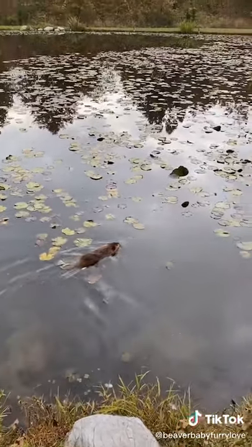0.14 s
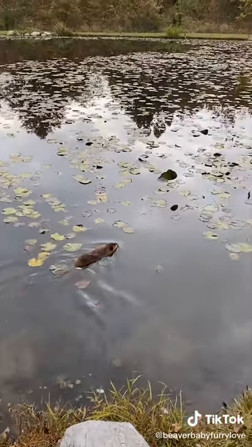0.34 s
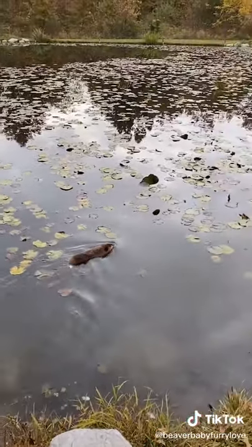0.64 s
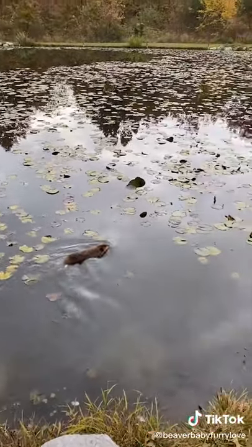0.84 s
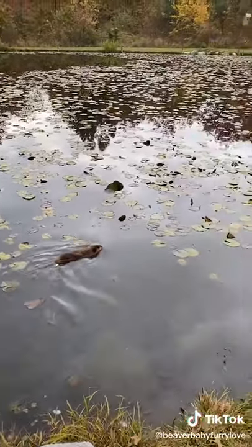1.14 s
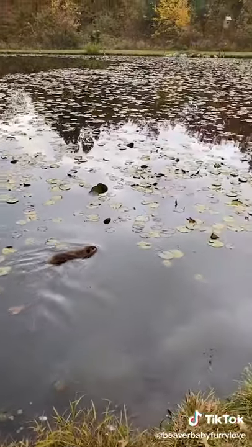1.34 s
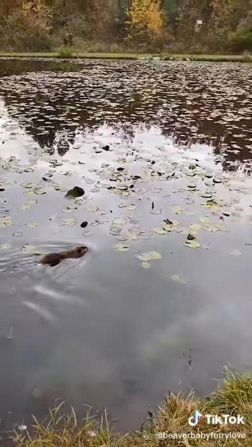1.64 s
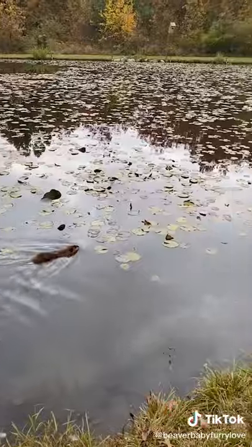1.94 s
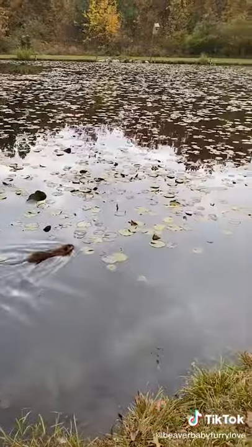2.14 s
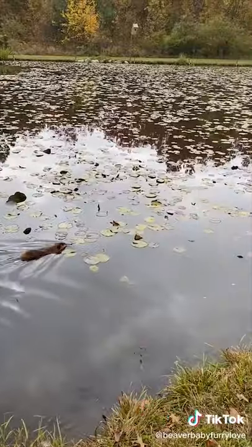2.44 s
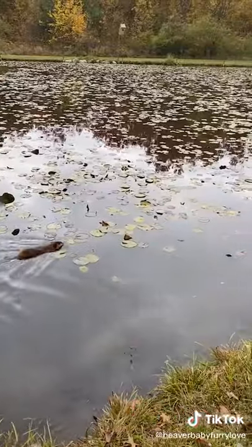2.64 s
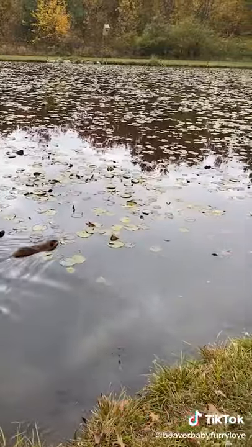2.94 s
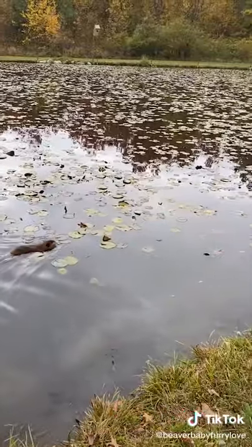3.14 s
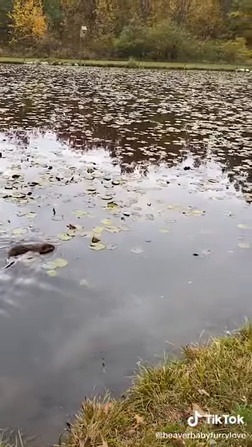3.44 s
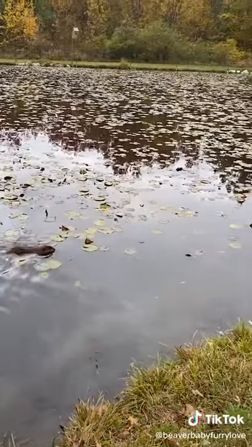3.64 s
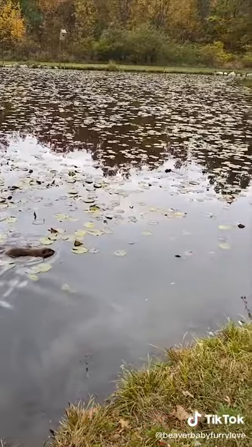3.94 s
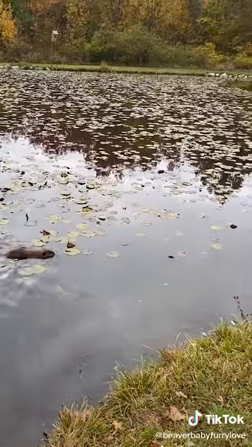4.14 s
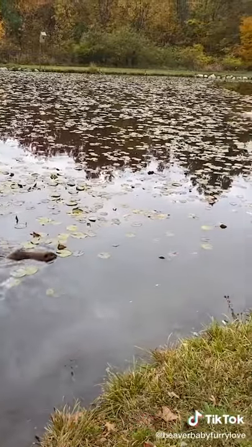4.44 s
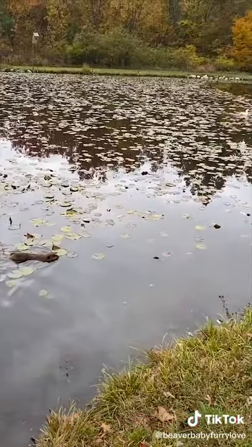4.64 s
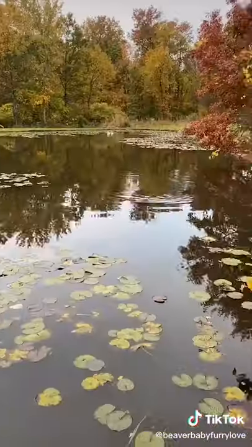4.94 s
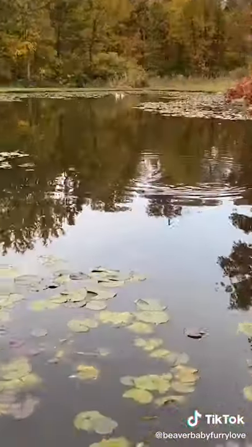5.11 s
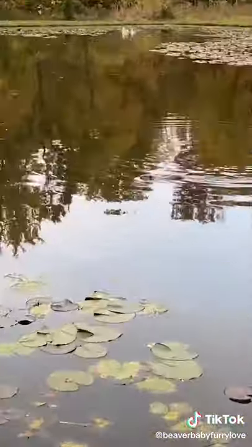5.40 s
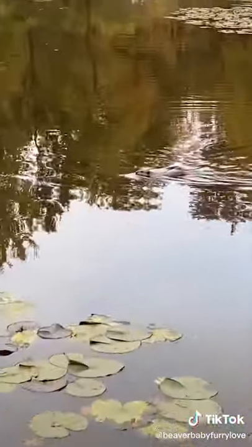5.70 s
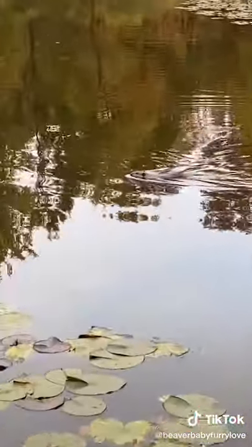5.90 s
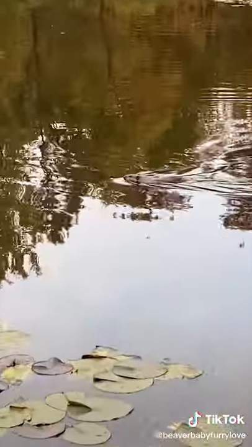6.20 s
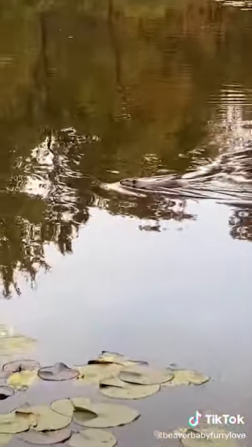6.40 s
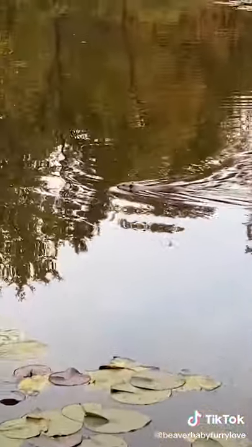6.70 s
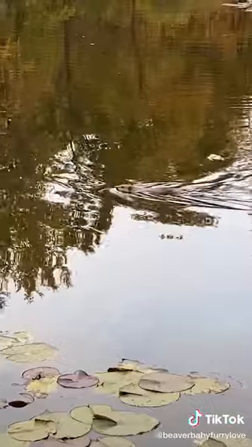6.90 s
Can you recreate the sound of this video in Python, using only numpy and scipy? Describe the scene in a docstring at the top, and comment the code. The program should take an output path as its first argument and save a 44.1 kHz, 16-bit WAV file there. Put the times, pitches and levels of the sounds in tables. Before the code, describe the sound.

Low rumble of distant traffic by a pond, with faint bird chirps and microphone bumps, cutting to quieter air and a far motor.

```python
"""A far road rumbles and hisses beyond a pond in autumn woods, and an engine drones under it.
Small birds chip and whistle in pitch glides, and crickets trill faintly, one pip to a wing stroke;
the trees scatter both into echoes. A hand bumps the microphone, and the bank grass rustles.
After a moment of silence near 5 s the scene changes to a much quieter place on the bank,
where the birds and crickets go on and a far motor swells."""
import sys
import numpy as np
from scipy import signal
from scipy.fft import rfft, irfft, next_fast_len
from scipy.io import wavfile
from scipy.ndimage import uniform_filter1d, map_coordinates

SR = 44100
rng = np.random.default_rng(int(sys.argv[2]) if len(sys.argv) > 2 else 0)


def master(y):
    """Save y as 16-bit WAV."""
    cut = np.clip(np.atleast_2d(y).T, -1, 1)
    pcm = np.round(cut * 32767)  # scale
    wavfile.write(sys.argv[1], SR, pcm.astype(np.int16))


N = 311346
TIME = np.arange(N) / SR
ROAD_END_S, CALM_START_S = 4.898, 4.965
CALM_LEAD_MS = 0.0084  # at the quiet place the callers are nearly straight ahead

# Stereo width of the noise near the road: frequency_hz, side_over_mid_db
ROAD_WIDTH = [(60, -36.5), (92, -32.5), (140, -19.5), (220, -13.5), (330, -6.5), (510, -0.5), (790, 1),
              (1800, -2.5), (4400, 5.5), (6800, -1)]
# Stereo width of the noise at the quiet place: frequency_hz, side_over_mid_db
CALM_WIDTH = [(60, -27.5), (170, -15.5), (290, -10), (490, -6), (1400, -3), (6800, -22.5)]


def traffic():
    """Many far vehicles add incoherently into a rumble and a tyre hiss, both slowly growing."""
    # Spectra: frequency_hz, density_db
    rumble_spectrum = [(12, -56.5), (22, -19), (42, -7), (60, 1), (81, 0.5), (99, -3), (129, -9),
                       (161, -13.5), (230, -18.5), (310, -24), (410, -29), (490, -39.5), (600, -46.5),
                       (900, -84)]
    tyre_spectrum = [(150, -16.5), (420, 4.5), (600, -1), (850, 3), (1300, 2), (1700, -5.5), (2200, -12),
                     (2900, -26.5), (4400, -32), (6500, -33.5), (9000, -84.5)]
    # Balance of the tyre hiss: frequency_hz, left_over_right_db
    balance = [(170, -3), (490, -4), (830, 4.5), (1400, 5), (2400, -2.5), (6800, -1.5)]
    rumble = amp(-46.5 + 0.5455 * TIME) * rush(rumble_spectrum, ROAD_WIDTH, patchy_db=-0.5)
    tyre_db = -66 + 0.89 * TIME + 0.88 * wobble(9)
    tyres = amp(tyre_db) * rush(tyre_spectrum, ROAD_WIDTH, patchy_db=2)
    return rumble + filtered(tyres, lambda hz: amp(along(balance, hz) * np.array([[.5], [-.5]])))


def far_engine():
    """Pitch follows rotation speed: a low drone revs up, sinks back, then rises again and holds."""
    # time_s, pitch_hz, level_db
    course = [(0, 79.02, -42.5), (.5, 70.6, -49), (1.9, 72.68, -48.5), (2.35, 77.67, -79),
              (2.63, 107, -43.5), (3.15, 89.9, -53), (3.8, 76.05, -57), (4.3, 93.6, -48.5),
              (4.9, 94.05, -48.5)]
    return drone(course, octave_db=-21, waver_db=-0.5, drift=0.026, rate_hz=12)


def nearing_car():
    """One car's band of noise grows as it nears, with less loss to spreading."""
    # time_s, level_db
    approach = [(0, -86.5), (2.6, -85), (3.7, -71), (4.3, -69), (4.8, -63.5)]
    # frequency_hz, density_db
    spectrum = [(200, -21.5), (480, 6), (700, 1.5), (1100, -6), (1700, -5.5), (2300, -11), (3200, -19),
                (5000, -35.5), (9000, -71)]
    level_db, = curves(approach)
    return amp(level_db) * rush(spectrum, ROAD_WIDTH)


def birds():
    """Birdsong is frequency modulation: each kind of call repeats its own glide, buzz and rasp."""
    # Calls: start_s, length_s, middle_pitch_hz, level_db
    slurs = [(1.04, 0.057, 3950, -72), (1.18, 0.073, 3580, -76), (1.828, 0.056, 3860, -75.5),
             (2.048, 0.042, 4020, -80.5), (2.842, 0.064, 4300, -79), (3.85, 0.071, 4130, -82.5),
             (3.98, 0.053, 3970, -78), (4.015, .055, 3650, -77), (4.125, 0.051, 3670, -77),
             (4.16, .04, 3920, -78), (4.275, 0.048, 4030, -74), (4.412, 0.062, 3850, -79),
             (4.628, 0.06, 3790, -77), (4.775, 0.047, 3506, -78.5)]  # straight downward slides
    buzzes = [(0.255, 0.14, 5720, -84), (1.322, 0.064, 5240, -73), (2.803, 0.026, 4930, -79),
              (2.875, 0.045, 5400, -81), (4.805, 0.1, 5500, -85.5), (5.361, 0.053, 5600, -90),
              (5.73, 0.023, 4330, -92), (5.735, 0.19, 5440, -100), (5.92, 0.14, 5530, -96),
              (6.55, 0.066, 5320, -90.5), (6.869, 0.057, 5420, -98)]  # level rasps from deep in the trees
    hooks = [(4.208, .11, 7220, -57), (5.19, 0.115, 7160, -81.5), (5.305, 0.049, 7380, -85.5)]  # thin whistles that drop and level out
    wisps = [(0.671, 0.084, 6800, -77.5), (2.73, .04, 6550, -83), (3.385, 0.074, 8140, -80)]  # high, far and blurred
    lisps = [(.56, 0.043, 7440, -82), (1.635, 0.054, 7300, -65.5), (2.139, .06, 7870, -75),
             (6.714, .028, 7060, -88), (6.877, 0.065, 6700, -88.5)]  # soft and rising
    ticks = [(2.381, 0.018, 7500, -67), (2.436, 0.017, 7370, -63.5), (2.492, 0.017, 7550, -64.5)]  # very short upward flicks
    twitters = [(6.602, 0.049, 8400, -98), (6.644, 0.071, 8300, -90), (6.711, 0.068, 8030, -90)]  # high notes arching up and down
    chirps = [(5.806, 0.066, 2810, -87.5), (6.165, .048, 3020, -92), (6.21, 0.05, 2490, -89.5),
              (6.257, 0.053, 2180, -88), (6.45, 0.025, 2760, -95), (6.795, 0.05, 2130, -89.5)]  # the lower voice of a bigger bird
    pipes = [(6.268, .04, 1610, -92), (6.3, 0.1, 2030, -96), (6.355, 0.046, 1580, -96)]  # low, hoarse notes that ring on
    squawks = [(1.851, 0.049, 2570, -72.5), (1.86, .05, 2070, -71), (1.943, 0.036, 2450, -73),
               (2.47, 0.026, 2950, -80), (2.642, 0.026, 2480, -78.5), (4.03, 0.074, 2270, -76),
               (4.3, 0.038, 2200, -82), (5.3, .04, 3400, -94), (5.335, 0.036, 2640, -92),
               (6.134, 0.027, 2000, -91), (6.585, 0.025, 2200, -94), (6.765, 0.053, 2220, -97),
               (6.915, 0.027, 2200, -93)]  # hoarse and far
    chips = [(1.741, 0.0087, 6350, -38.5)]  # one sharp chip close by
    kinds = [  # calls, lead_ms, shape
        (slurs, .035, dict(glide=(1.13, .875), buzz_hz=70, rasp_hz=100, echo_db=-7, build_s=.0019)),
        (buzzes, .041, dict(glide=(.98, 1.01), buzz_hz=324, rasp_hz=44.5, echo_db=5.5,
                            build_s=.008, linger=1.25)),
        (hooks, .06738, dict(glide=(1.246, .97), buzz_hz=90, rasp_hz=100, echo_db=-4.5,
                             bend=.9, build_s=.0074)),
        (wisps, .0692, dict(glide=(1.1, .88), buzz_hz=150, rasp_hz=200, echo_db=5, build_s=.006)),
        (lisps, .068, dict(glide=(.86, 1.08), buzz_hz=149, rasp_hz=264, echo_db=-6)),
        (ticks, .068, dict(glide=(.98, 1.23), buzz_hz=503, rasp_hz=796, echo_db=-4)),
        (twitters, .025, dict(glide=(.94, .65), buzz_hz=90, rasp_hz=110, echo_db=-5, bend=.64)),
        (chirps, .1, dict(glide=(1.11, .94), buzz_hz=30, rasp_hz=60, echo_db=-4.5, build_s=.004)),
        (pipes, 0, dict(glide=(1.03, .95), buzz_hz=45, rasp_hz=85, echo_db=5, linger=1.3)),
        (squawks, .074, dict(glide=(1.04, .9), buzz_hz=108, rasp_hz=105, echo_db=.5, build_s=.0023)),
        (chips, .062, dict(glide=(.87, 1.17), buzz_hz=0, rasp_hz=40, echo_db=-10, octave_db=-25.5))]
    out = np.zeros((2, N))
    for calls, lead_ms, shape in kinds:
        for start_s, length_s, pitch_hz, level_db in calls:
            call = bird_note(length_s, pitch_hz, **shape)
            add_caller(out, start_s, amp(level_db) * call, lead_ms)
    return out


def bird_note(length_s, pitch_hz, glide, buzz_hz, rasp_hz, octave_db=-60, bend=1, **echo):
    """A frequency-modulated whistle and its echo; buzz_hz and rasp_hz are pitch deviations."""
    progress = np.linspace(0, 1, max(int(length_s * SR), 32))
    chance = wanderer(progress * length_s, knots=256)
    start, end = glide  # ratios to the middle pitch
    contour = np.polyval(np.polyfit([0, .5, 1], [start, 1, end], deg=2), progress ** bend)
    buzz = np.sin(phase_of(140 + 45 * chance(200)))
    phase = phase_of(pitch_hz * contour + buzz_hz * buzz + rasp_hz * chance(900))
    swell = np.abs(np.sin(np.pi * progress)) ** .7 * amp(3 * chance(150))
    tone = np.sin(phase) + amp(octave_db) * np.sin(2 * phase)
    return among_trees(unit(swell * tone), **echo)


def hand_bumps():
    """Structure-borne sound: each bump of the hand is one low cycle inside a shudder of noise."""
    # time_s, pitch_hz, level_db
    bumps = [(0.874, 114, -29), (0.905, 54.4, -30), (3.376, 78.5, -26.5), (3.417, 54.3, -22.5),
             (3.575, 58.7, -25), (4.111, 131, -38), (4.14, 109, -24.5)]
    out = np.zeros((2, N))
    for time_s, pitch_hz, level_db in bumps:
        cycles = (TIME - time_s) * pitch_hz
        out += amp(level_db) * np.sin(2 * np.pi * cycles) * np.exp(-(2 * cycles) ** 2)
        add_puff(out, time_s, pitch_hz, level_db - 19, length_s=0.098, octaves=0.6, spread=0)
    return out


def finger_tap():
    """A damped impact on the microphone's case: sudden onset, then exponential decay."""
    # frequency_hz, density_db
    spectrum = [(120, -10), (330, 2), (500, 4), (800, -8), (1300, -9), (1900, -7), (3000, -22), (8000, -35)]
    start_s, level_db, t60_s = 5.017, -59.5, 0.062
    age = TIME - start_s
    return (age > 0) * amp(level_db - 60 * np.maximum(age, 0) / t60_s) * rush(spectrum, CALM_WIDTH)


def sheltered_air():
    """Stationary noise at the quiet place: a weak rumble and a faint wash of air."""
    # Spectra: frequency_hz, density_db
    rumble_spectrum = [(15, -59), (25, -30), (48, -7.5), (75, 2), (120, -6.5), (145, -13), (200, -16.5),
                       (228, -16), (275, -21.5), (315, -28.5), (500, -44.5), (800, -79.5)]
    air_spectrum = [(150, -19), (400, 6), (650, 3), (1000, -3.5), (1600, -9), (3000, -11), (4500, -13.5),
                    (5400, -13), (6500, -14.5), (8000, -23), (9000, -29.5), (14000, -37)]
    rumble = amp(-54.5) * rush(rumble_spectrum, CALM_WIDTH, patchy_db=1.5)
    return rumble + amp(-83) * rush(air_spectrum, CALM_WIDTH)


def far_motor():
    """A periodic tone and narrow-band exhaust noise swell together."""
    # Tone: time_s, pitch_hz, level_db
    course = [(5, 226, -74.5), (6.55, 225, -76.5), (6.8, 227, -61.5), (7.06, 226, -60.5)]
    # Exhaust: time_s, level_db
    swell = [(5, -84.5), (6.5, -79.5), (6.72, -64), (6.92, -56), (7.06, -61.5)]
    # Exhaust: frequency_hz, density_db
    spectrum = [(110, -40), (170, -9), (215, 1.5), (255, -3.5), (290, -9.5), (350, -34.5), (600, -73)]
    tone = drone(course, octave_db=-35, waver_db=2.5, drift=0.012, rate_hz=20)
    exhaust_db, = curves(swell)
    return tone + amp(exhaust_db) * rush(spectrum, CALM_WIDTH)


def brief_hiss():
    """Broadband noise opens the quiet scene: exponential rise, short hold, fast decay."""
    # frequency_hz, density_db
    spectrum = [(100, 22), (400, 4.5), (1800, -2.5), (3000, -8.5), (7500, -11), (10000, -14), (15500, -14)]
    rise_db_per_s, fall_db_per_s, fall_start_s = 121, 598, 0.099
    age = TIME - CALM_START_S
    rise_db = rise_db_per_s * np.minimum(age - fall_start_s / 2, 0)
    fall_db = fall_db_per_s * np.maximum(age - fall_start_s, 0)
    return amp(-62.5 + rise_db - fall_db) * rush(spectrum, CALM_WIDTH)


def grass():
    """Friction in the grass gives grainy scuffs; the fracture of dry stalks gives tiny snaps."""
    # time_s, length_s, centre_hz, level_db
    scuffs = [(0.3, 0.12, 4100, -76.5), (0.443, 0.092, 1180, -59), (0.891, .14, 4000, -77.5),
              (1.72, 0.11, 1120, -59.5), (2.468, 0.14, 1310, -67), (3.371, 0.039, 1120, -55.5),
              (3.558, 0.079, 725, -61.5), (5.659, 0.11, 670, -82.5)]
    # time_s, centre_hz, width_octaves, level_db
    snaps = [(.11, 4500, 0.35, -76), (.603, 9100, 0.13, -82), (1.169, 3200, 0.28, -69.5),
             (2.262, 11000, .15, -76.5), (3.825, 9500, 0.16, -84)]
    out = np.zeros((2, N))
    for time_s, length_s, centre_hz, level_db in scuffs:
        add_puff(out, time_s, centre_hz, level_db, length_s, octaves=.35, spread=0.27)
    out *= unit(amp(3.5 * wobble(180)))  # fast flutter makes the grain
    for time_s, centre_hz, octaves, level_db in snaps:
        add_puff(out, time_s, centre_hz, level_db, length_s=0.011, octaves=octaves, spread=0.94)
    return out


def crickets():
    """Stridulation: each uneven wing stroke makes one short falling pip, smeared by the trees."""
    # start_s, length_s, pitch_hz, level_db, echo_db
    bouts = [(-.05, 0.52, 3465, -86.5, 0.5), (0.38, 0.48, 3210, -88, 3), (0.8, 0.69, 3506, -87.5, 2),
             (1.47, 0.17, 3510, -83.5, 3), (1.681, 0.47, 3410, -82, -1.5), (2.25, 0.64, 3495, -86.5, -0.5),
             (2.952, 0.64, 3310, -87.5, -2.5), (3.403, 0.38, 3156, -89, 0.5), (4.003, .75, 3470, -91, 2.5),
             (5.78, 0.28, 3384, -94.5, 1.5), (6.0, 0.43, 3223, -93, 0.5), (6.62, 0.51, 3450, -94.5, -5.5)]
    strokes_per_s, sounding_share = 25.7, .45
    sag_hz, jitter_hz, fade_s = 219.7, 95, 0.03
    out = np.zeros((2, N))
    for start_s, length_s, pitch_hz, level_db, echo_db in bouts:
        t = np.arange(int(length_s * SR)) / SR
        chance = wanderer(t, knots=1024)
        envelope = np.clip(np.minimum(t, length_s - t) / fade_s, 0, 1) * amp(chance(4.4))
        strokes = t * strokes_per_s + .11 * chance(strokes_per_s)
        progress = np.minimum(strokes % 1 / sounding_share, 1)
        phase = phase_of(pitch_hz - sag_hz * (progress - .5) + jitter_hz * chance(400))
        pips = np.sin(np.pi * progress) * np.sin(phase) * amp(1.8 * chance(strokes_per_s))
        trill = among_trees(envelope * unit(pips), echo_db)
        add_caller(out, start_s, amp(level_db) * trill, lead_ms=0.032)
    return out


def machine_hum():
    """A machine at nearly constant speed radiates a thin, nearly periodic hum."""
    # time_s, pitch_hz, level_db
    course = [(0, 350.8, -73.5), (1.5, 350.4, -67), (3.5, 352, -76.5), (4.9, 344.3, -64)]
    return drone(course, octave_db=-21, waver_db=2.5, drift=0.002, rate_hz=6.8)


def treble_hiss():
    """A faint treble hiss, hollow in the centre and wide around 7-8 kHz, where side exceeds mid."""
    # frequency_hz, density_db
    spectrum = [(1000, -0.5), (3000, 12.5), (4500, 8.5), (5600, 12.5), (7000, -7), (12000, 6), (13500, -38),
                (16000, -16.5)]
    # frequency_hz, side_over_mid_db
    width = [(3000, 4), (5600, -4), (6400, 6), (7100, 12), (8000, 15), (8800, -9), (12000, -5.5)]
    return amp(-82.5) * rush(spectrum, width)


def among_trees(call, echo_db, build_s=0.0013, linger=1):
    """Scattering by trees adds a diffuse echo that builds up and decays; linger scales its length."""
    # frequency_hz, t60_s
    decay_times = [(1000, 0.14), (5000, 0.65), (8000, 0.4), (14000, 0.27)]
    hz, t, noise = signal.stft(rng.standard_normal((2, SR * 3 // 4)), SR, nperseg=256)
    decay = amp(-60 * t / (linger * along(decay_times, hz)[:, None]))
    tail = signal.istft(noise * decay * (1 - np.exp(-t / build_s)), SR, nperseg=256)[1]
    tail /= np.linalg.norm(tail[0])
    mid, side = amp(echo_db) * signal.fftconvolve(call[None], tail, axes=1)
    mid[:len(call)] += call
    return stereo(mid, 0.014 * side)


def add_caller(track, start_s, sound, lead_ms):
    """Arrival-time difference gives direction: the left leads, by lead_ms at the place by the road."""
    by_road = start_s < ROAD_END_S
    lead_s = (lead_ms if by_road else CALM_LEAD_MS) / 1000
    sound = filtered(sound, lambda hz: np.exp(1j * np.pi * hz * lead_s * np.array([[1], [-1]])))
    if by_road:  # the echo ends with its scene
        sound = sound[:, :round((ROAD_END_S - start_s) * SR)]
    add(track, start_s, sound)


def add_puff(track, time_s, centre_hz, level_db, length_s, octaves, spread):
    """Mix in band-limited noise under a Gaussian envelope that peaks at time_s."""
    t = np.arange(-SR // 4, SR // 4) / SR
    band = lambda hz: np.exp(-.5 * (np.log2((hz + 1) / centre_hz) / octaves) ** 2)
    mid, side = unit(filtered(rng.standard_normal((2, len(t))), band))
    envelope = amp(level_db) * np.exp(-(2 * t / length_s) ** 2)
    add(track, time_s + t[0], envelope * stereo(mid, spread * side))


def rush(spectrum, width, patchy_db=1.2):
    """Spectrally shaped stereo noise with patches of random gain; its mid has rms 1."""
    noise = signal.stft(rng.standard_normal((2, N)), nperseg=512)[2]
    patches = uniform_filter1d(rng.standard_normal(noise.shape[1:]), size=5, axis=0)
    patches = uniform_filter1d(patches, size=16, axis=1)
    pair = signal.istft(noise * amp(patchy_db * unit(patches)), nperseg=512)[1][:, :N]
    mid = filtered(pair[0], lambda hz: amp(along(spectrum, hz)))
    side = filtered(pair[1], lambda hz: amp(along(spectrum, hz) + along(width, hz)))
    return stereo(mid, side) / np.std(mid)


def drone(course, octave_db, waver_db, drift, rate_hz):
    """Two harmonics under slow random frequency and amplitude modulation."""
    pitch_hz, level_db = curves(course)
    phase = phase_of(pitch_hz * (1 + drift * wobble(rate_hz)))
    fundamental = np.sin(phase) * amp(waver_db * wobble(rate_hz))
    octave = np.sin(2 * phase) * amp(octave_db + waver_db * wobble(rate_hz))
    return amp(level_db) * unit(fundamental + octave)


def amp(db):
    """Decibels to gain."""
    return 10 ** (np.asarray(db) / 20)


def unit(x):
    """Scale to rms 1."""
    return x / np.sqrt(np.mean(x ** 2) + 1e-20)


def stereo(mid, side):
    """Left and right are the sum and difference of mid and side."""
    return np.array([mid + side, mid - side])


def phase_of(hz):
    """Phase is the running integral of frequency."""
    return 2 * np.pi * np.cumsum(hz) / SR


def along(points, hz):
    """Interpolate (frequency_hz, value) points on a logarithmic frequency axis."""
    knots_hz, values = np.transpose(points)
    return np.interp(np.log(hz + 1), np.log(knots_hz + 1), values)


def curves(rows):
    """Interpolate each column after time_s to one value per sample."""
    time_s, *columns = np.transpose(rows)
    return [np.interp(TIME, time_s, column) for column in columns]


def wobble(rate_hz):
    """A smooth random curve with rate_hz knots a second."""
    return map_coordinates(rng.standard_normal(int(N * rate_hz / SR) + 4), [TIME * rate_hz])


def wanderer(t, knots):
    """A function that draws a fresh smooth random curve over the times t at a given rate."""
    return lambda rate_hz: map_coordinates(rng.standard_normal(knots), [t * rate_hz], mode="wrap")


def filtered(x, response):
    """Linear filtering: multiply the spectrum by a frequency response."""
    n = x.shape[-1]
    padded = next_fast_len(n + 8192)
    return irfft(rfft(x, padded) * response(np.fft.rfftfreq(padded, 1 / SR)), padded)[..., :n]


def add(track, start_s, sound):
    """Superpose a sound on the track from start_s."""
    first = round(start_s * SR)
    sound = sound[:, max(-first, 0):]
    part = track[:, max(first, 0):][:, :sound.shape[1]]
    part += sound[:, :part.shape[1]]


def scene():
    """Superposition: the two places in turn, with birds, insects and small noises over them."""
    calm = sheltered_air() + far_motor() + brief_hiss()
    calm *= amp([[-.5], [.5]])  # leans 1 dB to the right
    road = traffic() + far_engine() + machine_hum() + nearing_car() + treble_hiss()
    background = np.where(TIME < ROAD_END_S, road, calm)
    return background + birds() + crickets() + grass() + hand_bumps() + finger_tap()


def record(dry):
    """Band limiting sheds the deepest bass and top treble; a brief silence parts the two scenes."""
    low_cut_hz, top_hz = 35, 15700
    fade_out_s, fade_in_s = .002, .012
    sound = filtered(dry, lambda hz: 1 / np.sqrt(1 + (low_cut_hz / (hz + 1)) ** 8))
    road_gate = np.clip((ROAD_END_S - TIME) / fade_out_s, 0, 1)
    calm_gate = np.clip((TIME - CALM_START_S) / fade_in_s, 0, 1)
    return filtered(sound * (road_gate + calm_gate), lambda hz: hz < top_hz)


dry = scene()
out = record(dry)
master(out)
```